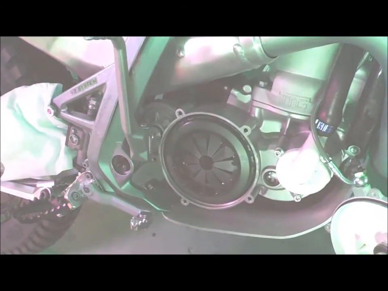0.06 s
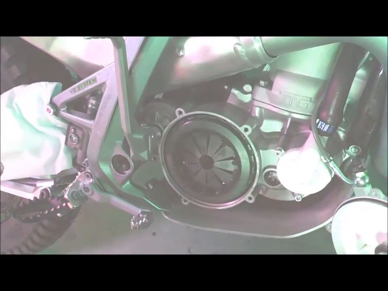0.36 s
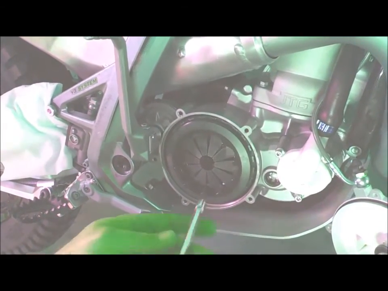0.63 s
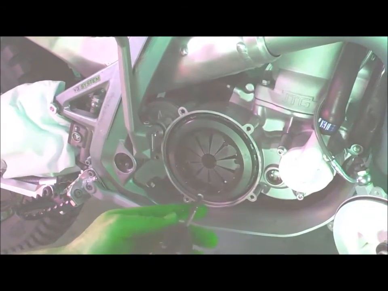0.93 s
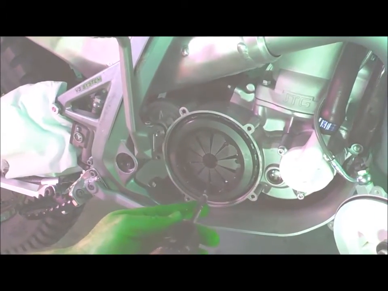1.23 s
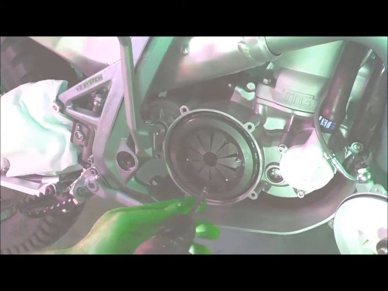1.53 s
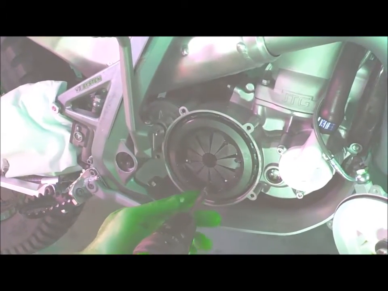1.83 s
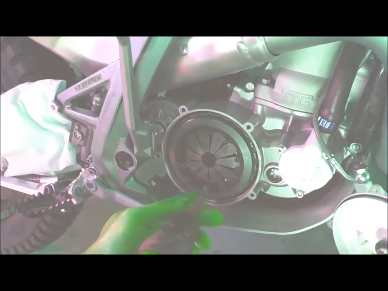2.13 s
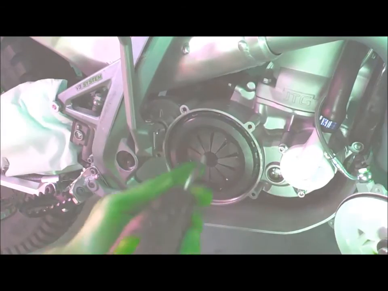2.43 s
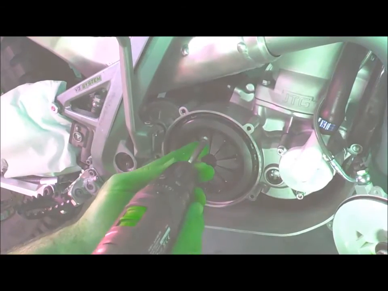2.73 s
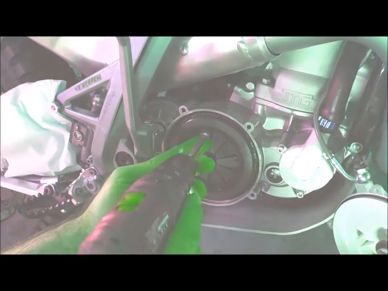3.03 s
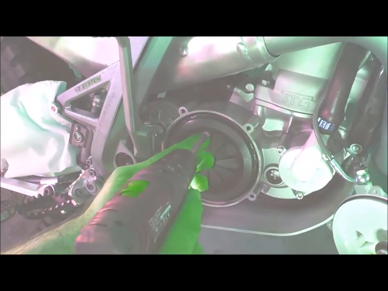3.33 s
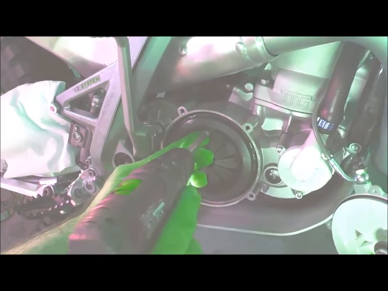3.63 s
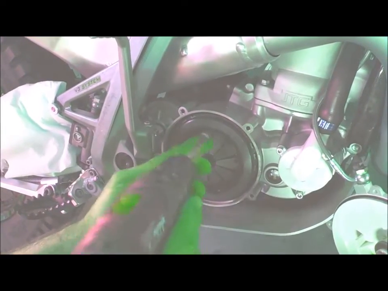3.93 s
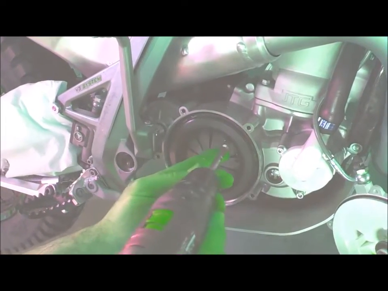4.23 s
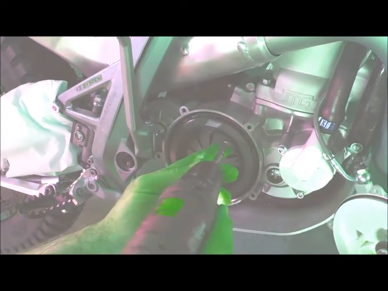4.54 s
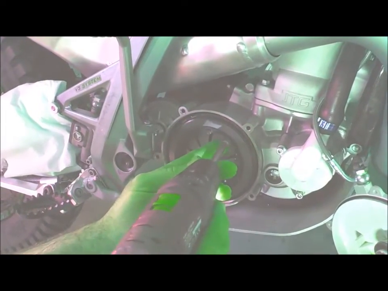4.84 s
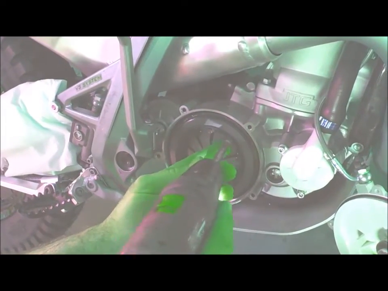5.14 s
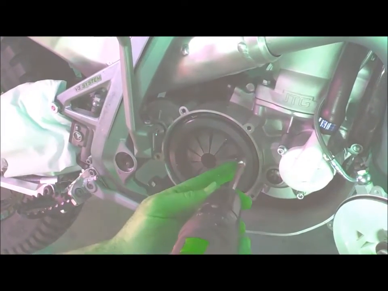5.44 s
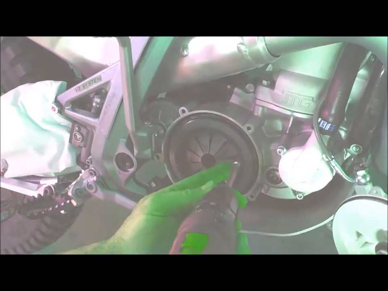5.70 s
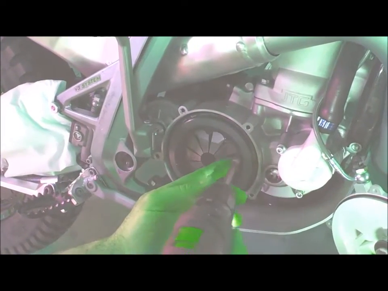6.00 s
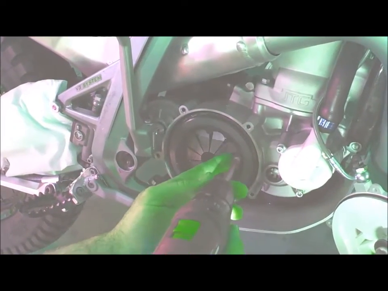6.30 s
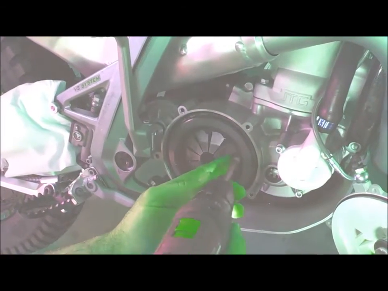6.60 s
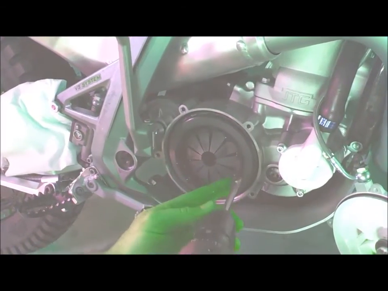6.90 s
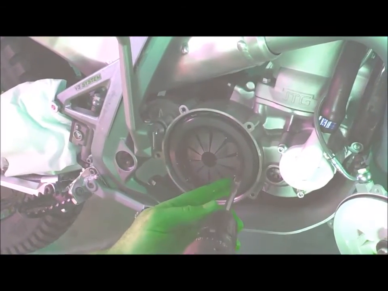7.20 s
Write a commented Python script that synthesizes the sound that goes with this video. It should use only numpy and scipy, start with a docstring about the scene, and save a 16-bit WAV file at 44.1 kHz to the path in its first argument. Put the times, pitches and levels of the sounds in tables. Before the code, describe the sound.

A cordless impact driver runs in five screws, each short whirring, rattling burst ending in a hammering buzz, with sharp metal clicks between.

```python
"""Impact driver on a motorcycle clutch.

A cordless impact driver runs five screws in, in a hard-walled workshop. Each time the bit clicks
into the screw head, the motor spins up with a whine, the gears grind and the bit rattles in its
holder. The screw seats, the hammer buzzes on its anvil until the trigger is let go, and the room
rings on. A rubber glove slides on the grip before the first two screws."""
import sys
import numpy as np
from scipy import signal
from scipy.fft import rfft, irfft, next_fast_len
from scipy.io import wavfile
from scipy.ndimage import map_coordinates

SR = 44100
rng = np.random.default_rng(int(sys.argv[2]) if len(sys.argv) > 2 else 0)


def dump_mix(stems):
    """Bounce the given channels to the path in sys.argv[1] as a 16-bit WAV at rate SR."""
    frames = np.atleast_2d(stems).T  # one column per channel
    limited = np.clip(frames, -1, 1)  # hard clip at full scale
    pcm = np.round(limited * 32767).astype(np.int16)
    wavfile.write(sys.argv[1], SR, pcm)


N = 320166
T = np.arange(N) / SR

# Per screw: motor start t/s, spin-up/s, free run/s, hammering/s, bit ring f/Hz,
# then trim/dB of rattle, grind, blows, start clack, catch clack
SCREW_RUNS = [(0.769, 0.13, 0.52, 0.28, 7700, -1, -2, 0.1, -15, -31),
              (2.316, 0.096, 0.52, 0.28, 6800, 0, 1, 0.5, -9, -10),
              (3.779, .097, .416, .239, 7300, 0.5, 0, 0, -10.5, -6),
              (5.218, .101, .486, .239, 7400, 0, -1.5, .5, -20, -10.5),
              (6.702, 0.094, 0.45, .24, 7440, 0, -1, -0.5, -12, -5.5)]
# Trigger clicks: t/s, relative level/dB, ring f/Hz
TRIGGER_CLICKS = [(0.686, -14.5, 7740), (2.232, -10.5, 6860), (3.717, -9.5, 7950), (5.157, -11, 7650),
                  (6.634, -12, 7700)]
# Bit taps on screw heads and clutch: t/s, relative level/dB, ring f/Hz, knock trim/dB
BIT_TAPS = [(.511, -26, 3900, -3), (.531, -10, 9700, -19), (.579, -27, 4440, -3), (2.012, -12.5, 9650, -12),
            (2.055, -20.5, 9380, -22), (2.156, -38, 8510, 4.5), (3.498, -11, 11700, -7),
            (3.657, -31.5, 7970, 1.5), (3.741, -22, 5000, -13), (3.761, -24, 4240, -9),
            (4.897, -32.5, 4440, -4), (4.931, -31.5, 5130, -1.5), (5.042, -26, 8950, -4.5),
            (6.307, -23.5, 11590, -6.5), (6.425, -36, 8300, -0.5), (6.575, -30.5, 4600, -5),
            (6.591, -17.5, 8350, -9.5)]
# Glove slides: start t/s, peak t/s, level/dB
GLOVE_SLIDES = [(0.144, 0.308, -37), (1.962, 2.047, -32)]
# Background envelope: t/s, level/dB
AIR_LEVEL = [(0, -43.5), (4.75, -45.5), (5.1, -52.5), (6.45, -47.5)]

# Source spectra: f/Hz, relative level/dB
HAMMER_SPECTRUM = [(350, -71.5), (600, -15.5), (882, -8.5), (1300, -8.5), (1410, -7.5), (1830, -10.5),
                   (2330, -4.5), (2960, -9.5), (3340, -3.5), (3810, -3.5), (4130, -1), (6150, -5.5),
                   (7610, 2.5), (13100, -9.5), (14400, -8.5)]
RATTLE_SPECTRUM = [(1760, -53.5), (3000, -19), (4330, -7.5), (4720, -10.5), (5110, -6), (6050, -10),
                   (6810, -2.5), (7320, 1.5), (8350, -0.5), (10200, -7.5), (11100, -9.5), (13100, -7.5),
                   (14400, -17)]
GRIND_SPECTRUM = [(200, -33), (380, -38), (560, -10), (900, 1.5), (1300, -2), (1700, 1), (2200, 4.5),
                  (2800, -1.5), (4200, 5), (5200, 3.5), (6500, -16), (14000, -15)]
CRACK_SPECTRUM = [(500, -18.5), (2000, -5.5), (4000, 5.5), (6000, -8.5), (8500, 10), (11000, 0.5),
                  (14500, -5.5)]
KNOCK_SPECTRUM = [(60, -23), (250, -11), (700, 4.5), (2200, -4), (4000, -8), (9000, -17)]
RUBBER_SPECTRUM = [(290, -37), (500, -2), (902, -27), (1130, 0), (2350, -6), (2980, 0.5), (8320, 3),
                   (14400, -5.5)]
AIR_SPECTRUM = [(30, -24), (90, -15.5), (170, -7.5), (300, 0), (650, 1.5), (1200, 0.5), (2200, 1),
                (3200, -2.5), (4600, 0.5), (6500, -10.5), (9000, -1.5), (11000, -11), (14400, -3)]
# Modes of driver nose and clutch basket, and of the bit: f/Hz, width/Hz, relative level/dB
BASKET_MODES = [(830, 40, -18), (1013, 16, -15), (1413, 46, -3.5), (2006, 74, -7), (2240, 210, -14.5),
                (3600, 42, -34), (4030, 33, -33)]
BIT_MODES = [(7560, 140, -9), (8900, 370, 1)]
# Motor whine: multiple of shaft speed, relative level/dB
WHINE_ORDERS = [(1, -53), (2, -53), (3, -39.5)]
# Labouring motor: f/Hz, waver/fraction of pitch, relative level/dB
GROAN_TONES = [(398, .05, -45), (530, .1, -45.5)]

# Reverb decay: f/Hz, t60/s
REVERB_T60 = [(200, 5.8), (1000, 1.51), (2500, 0.85), (5000, 0.85), (9000, 0.55), (14000, 0.19)]
# Reverb spectrum: f/Hz, level/dB
REVERB_SPECTRUM = [(200, -19), (1000, -1), (2500, 3.5), (4500, -2), (7500, -8.5), (9500, 0), (14000, -6)]
# Microphone port balance: f/Hz, left minus right level/dB
PORT_BALANCE = [(60, 1), (250, 8), (600, 5), (1200, 1.5), (2500, 1.5), (4000, 0.5), (5200, -5.5),
                (6200, -6), (7000, 16), (7900, 10), (9000, 18.5), (10500, 7.5), (13000, 12), (14500, 1.5)]
# Likeness of noise at the two ports: f/Hz, correlation
PORT_CORRELATION = [(100, 0.044), (600, 0.06), (2000, 0.062), (5000, 0.32), (8000, 0.3), (14000, 0.035)]


def driver():
    """Five screws, each run in freely, then hammered tight."""
    out = np.zeros((2, N))
    for start_s, spin_up_s, run_s, hammer_s, ring_hz, rattle_db, grind_db, blows_db, _, _ in SCREW_RUNS:
        seat_s = start_s + run_s
        stop_s = seat_s + hammer_s
        span = slice(int(start_s * SR), int((stop_s + .1) * SR))
        out[:, span] += free_run(T[span], start_s, spin_up_s, seat_s, ring_hz, rattle_db, grind_db)
        out[:, span] += amp(blows_db) * hammering(T[span], seat_s, stop_s)
    return out


def hammering(t, seat_s, stop_s, blows_per_s=259):
    """Two lugs strike the anvil in turn, hardest at first; the labouring motor groans in fits."""
    age_s = np.maximum(t - seat_s, 0)
    blow_db = -13 + 3.5 * np.exp(-age_s / .02)
    rate_hz = blows_per_s * (1 + .008 * wobble(12, len(t)))
    kicks = impacts(rate_hz, [.8, -.8], scatter_db=.5, jitter_s=.00012)
    strikes = chatter(kicks, t60_s=.019, wash_db=-3) + amp(-12) * kicks
    blows = amp(blow_db) * basket(coloured(strikes, HAMMER_SPECTRUM))
    groan = 0
    for hz, waver, db in GROAN_TONES:
        turns = np.cumsum(hz * (1 + waver * wobble(50, len(t)))) / SR
        groan += amp(db) * wobble(35, len(t)) * np.sin(2 * np.pi * turns)
    groan *= np.clip(age_s / .06, 0, 1)
    return (blows + groan) * gate(t, seat_s, stop_s, rise_s=.00127, fall_s=.0023)


def free_run(t, start_s, spin_up_s, seat_s, ring_hz, rattle_trim_db, grind_trim_db):
    """The motor spins up on an S-curve, then sags as the thread tightens just before seating."""
    full_speed_hz, tighten_s, sag = 348, .053, .09
    age = np.maximum(t - start_s, 0) / spin_up_s
    spun = 1 - np.exp(-age ** 1.4)
    torque = 4 * spun * (1 - spun)
    tight = np.clip((t - seat_s + tighten_s) / tighten_s, 0, 1)
    speed = spun * (1 - sag * tight ** 2)
    shaft_hz = full_speed_hz * speed * (1 + .0018 * wobble(40, len(t)))
    loose = speed ** 7  # separate knocks emerge only near full speed
    # base + spin-up surge + tightening
    rattle_db = -17.5 + 18 * np.exp(-(age / 1.69) ** 2) + 2 * tight
    grind_db = -38 + 27 * (1 - spun) ** .74 + 7 * tight - 2.5 * loose
    knock_hz = .662 * shaft_hz
    rattle = bit_rattle(knock_hz, loose, ring_hz)
    grind = gear_grind(shaft_hz, speed)
    whistle = gear_whistle(shaft_hz, knock_hz, loose)
    out = spun * amp(rattle_db + rattle_trim_db) * (rattle + whistle)
    out += amp(grind_db + grind_trim_db) * grind
    out += motor_whine(shaft_hz, speed, torque)
    return out * gate(t, start_s, seat_s, rise_s=.021, fall_s=.0032)


def bit_rattle(knock_hz, loose, ring_hz):
    """The unloaded bit knocks in its holder and rings; a hiss at low speed."""
    knocks = impacts(knock_hz, [2, 0, -1], scatter_db=2.5, jitter_s=.00012)
    clatter = np.sqrt(loose) * chatter(knocks, t60_s=.036, wash_db=-19)
    hiss = np.sqrt(1 - loose) * noise(len(loose))
    rattle = basket(coloured(clatter + hiss, RATTLE_SPECTRUM))
    modes = [(ring_hz, 200, 9), *BIT_MODES]
    ring = unit(filtered(knocks, lambda hz: resonances(hz, modes)))
    return amp(-1.5 * loose) * rattle + amp(-5.5) * loose ** 2 * ring


def gear_grind(shaft_hz, speed):
    """Teeth grind under load; the mesh turns tonal with speed."""
    teeth = impacts(shaft_hz, [3, -3, 0], scatter_db=.5, jitter_s=.00003)
    mesh = chatter(teeth, t60_s=.017, wash_db=2) + amp(2) * speed ** 2 * teeth
    return basket(coloured(mesh, GRIND_SPECTRUM))


def gear_whistle(shaft_hz, knock_hz, loose, order=20.3, width_hz=150):
    """A shrill gear tone follows the shaft and flutters at the bit's knock rate."""
    flutter = 1 + 1.54 * np.cos(2 * np.pi * np.cumsum(knock_hz) / SR)
    tone = np.sin(2 * np.pi * order * np.cumsum(shaft_hz) / SR)
    return amp(-7) * loose * flutter * wobble(width_hz, len(loose)) * tone


def motor_whine(shaft_hz, speed, torque, swell_db=9.5, housing_hz=450):
    """Shaft harmonics swell and waver with torque; the small housing radiates little bass."""
    n = len(speed)
    waver = (.005 + .065 * torque) * wobble(110, n)
    turns = np.cumsum(shaft_hz * (1 + waver)) / SR
    whine = sum(amp(db + 2.2 * wobble(45, n)) * np.sin(2 * np.pi * k * turns) for k, db in WHINE_ORDERS)
    whine *= amp(swell_db * torque ** 4) * speed
    return filtered(whine, lambda hz: 1 - 1 / (1 + (hz / housing_hz) ** 6))


def basket(x):
    """Driver nose and clutch basket add their modes to whatever shakes them; rms 1."""
    return unit(filtered(x, lambda hz: 1 + resonances(hz, BASKET_MODES)))


def impacts(rate_hz, pattern_db, scatter_db, jitter_s):
    """Sharp kicks in a repeating strength pattern, scattered in level and time."""
    n = len(rate_hz)
    at = np.flatnonzero(np.diff(np.floor(np.cumsum(rate_hz) / SR)))
    late, strength = rng.standard_normal((len(at), 2)).T
    at = np.clip(at + (jitter_s * SR * late).astype(int), 0, n - 1)
    kicks = np.zeros(n)
    kicks[at] = amp(np.resize(pattern_db, len(at)) + scatter_db * strength)
    return unit(kicks)


def chatter(kicks, t60_s, wash_db):
    """Each kick sets loose parts chattering briefly, over a steady wash."""
    envelope = signal.lfilter([1], [1, -amp(-60 / (t60_s * SR))], kicks)
    return unit((unit(envelope) + amp(wash_db)) * noise(len(kicks)))


def contacts(clack_hz=7570):
    """Steel contacts: t/s, relative level/dB, ring f/Hz, knock trim/dB."""
    rows = []
    for s, db, hz in TRIGGER_CLICKS:  # a faint tick leads each click
        rows += [(s - .012, db - 19, hz, -25), (s, db, hz, -25)]
    for s, db, hz, knock_db in BIT_TAPS:  # one rebound, weaker and duller
        rows += [(s, db, hz, knock_db), (s + .013, db - 17.5, hz, knock_db + 10)]
    for s, *_, start_db, catch_db in SCREW_RUNS:  # gears take up slack, then catch the bit
        rows += [(s, start_db, clack_hz, -18.5), (s + .0185, catch_db, clack_hz, -18.5)]
    return rows


def clicks(attack_s=.0012, ring_t60_s=.017, knock_t60_s=.071):
    """Each contact: a bright crack, a short steel ring, a duller knock of the clutch."""
    out = np.zeros((2, N + SR))
    t = np.arange(SR // 8) / SR
    for s, db, ring_hz, knock_db in contacts():
        fade = amp(-60 * t / ring_t60_s) * (1 - np.exp(-t / attack_s))
        crack = coloured(noise(len(t)) * fade, CRACK_SPECTRUM)
        mode = [(ring_hz, ring_hz / 10, 0)]
        ring = fade * unit(filtered(noise(len(t)), lambda hz: resonances(hz, mode)))
        knock = coloured(noise(len(t)) * amp(-60 * t / knock_t60_s), KNOCK_SPECTRUM)
        at = int(s * SR)
        out[:, at:at + len(t)] += amp(db + 1.5) * (crack + ring + amp(knock_db - 5) * knock)
    return out[:, :N]


def glove():
    """Rubber slides unevenly over the grip."""
    level = sum(amp(db) * gate(T, start_s, peak_s, rise_s=peak_s - start_s, fall_s=.055)
                for start_s, peak_s, db in GLOVE_SLIDES)
    return level * amp(wobble(120, N)) * coloured(noise(N), RUBBER_SPECTRUM)


def workshop_reverb(x, rise_s=.0027):
    """Hard walls ring about a second in the mids, longer in the bass, less in the treble."""
    hz, t, bins = signal.stft(rng.standard_normal((2, SR + SR // 4)), SR, nperseg=256)
    decay = amp(-60 * t / along(REVERB_T60, hz)[:, None]) * np.clip(t / rise_s, 0, 1)
    decay /= np.sqrt(np.mean(decay ** 2, axis=1, keepdims=True))
    decay *= amp(along(REVERB_SPECTRUM, hz))[:, None]
    tail = signal.istft(bins * decay, SR, nperseg=256)[1]
    return signal.fftconvolve(x, tail / np.sqrt(tail.shape[1]), axes=1)[:, :N]


def room_tone():
    """Faint workshop air; the level dips near 5 s."""
    level_db = np.interp(T, *np.transpose(AIR_LEVEL))
    return amp(level_db) * coloured(noise(N), AIR_SPECTRUM)


def amp(db):
    """Decibels to gain."""
    return 10 ** (np.asarray(db) / 20)


def unit(x):
    """x at rms 1."""
    return x / np.sqrt(np.mean(x ** 2) + 1e-20)


def along(points, hz):
    """(f/Hz, value) points read on a log axis."""
    f, values = np.transpose(points)
    return np.interp(np.log(hz + 1), np.log(f + 1), values)


def gate(t, start_s, stop_s, rise_s, fall_s):
    """Linear rise from start, exponential fall from stop."""
    return np.clip((t - start_s) / rise_s, 0, 1) * np.exp(-np.maximum(t - stop_s, 0) / fall_s)


def wobble(rate_hz, n):
    """Smooth random curve, rate_hz knots a second."""
    knots = rng.standard_normal(int(n * rate_hz / SR) + 4)
    return map_coordinates(knots, [np.arange(n) * rate_hz / SR])


def resonances(hz, modes):
    """Summed response of (f/Hz, width/Hz, level/dB) modes."""
    return sum(amp(db) * 1j * hz * width / (f * f - hz * hz + 1j * hz * width) for f, width, db in modes)


def filtered(x, response):
    """x through a frequency response."""
    n = x.shape[-1]
    padded = next_fast_len(n + SR // 10)
    return irfft(rfft(x, padded) * response(np.fft.rfftfreq(padded, 1 / SR)), padded)[..., :n]


def coloured(x, spectrum, taps=2048):
    """x through a minimum-phase filter of energy 1."""
    gain = amp(along(spectrum, np.fft.rfftfreq(taps, 1 / SR)))
    cepstrum = irfft(np.log(gain + 1e-6))
    cepstrum[1:taps // 2] *= 2
    cepstrum[taps // 2 + 1:] = 0
    kernel = irfft(np.exp(rfft(cepstrum)))
    return signal.fftconvolve(x, kernel[None] / np.linalg.norm(kernel), axes=1)[:, :x.shape[1]]


def noise(n):
    """White noise, partly alike at the two ports."""
    def mid_side(hz):
        angle = np.arccos(along(PORT_CORRELATION, hz)) / 2
        return np.array([np.cos(angle), np.sin(angle)])
    mid, side = filtered(rng.standard_normal((2, n)), mid_side)
    return np.array([mid + side, mid - side])


def scene():
    """Driver and clicks with their reverb, plus glove and air."""
    tool, ticks = driver(), clicks()
    reverb = workshop_reverb(amp(-.5) * tool + amp(-10) * ticks)
    return tool + ticks + reverb + glove() + room_tone()


def record(dry, cutoff_hz=14550):
    """Each microphone port has its own resonance; peaks flatten, the top treble is cut."""
    def ports(hz):
        lean = amp(along(PORT_BALANCE, hz) / 2)
        return np.array([lean, 1 / lean]) / np.sqrt((lean ** 2 + lean ** -2) / 2)
    x = filtered(dry, ports)
    limited = x / (1 + np.abs(x) ** 16) ** (1 / 16)
    return filtered(limited, lambda hz: np.clip((cutoff_hz - hz) / 200 + .5, 0, 1))


dry = scene()
out = record(dry)
dump_mix(out)
```